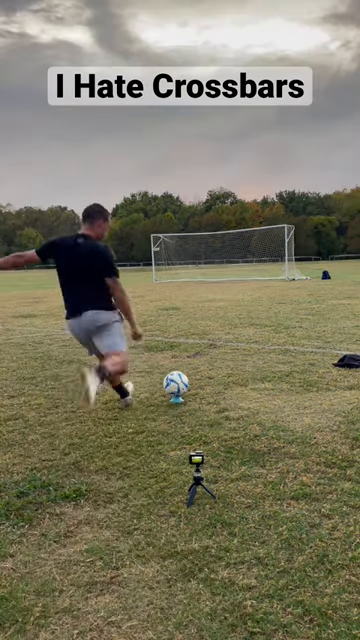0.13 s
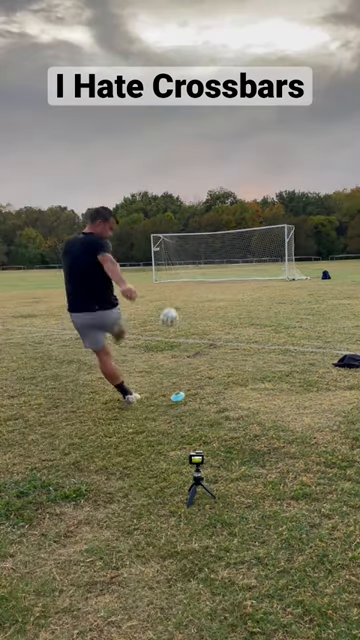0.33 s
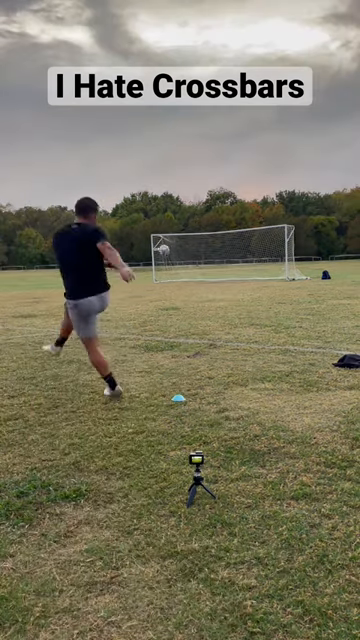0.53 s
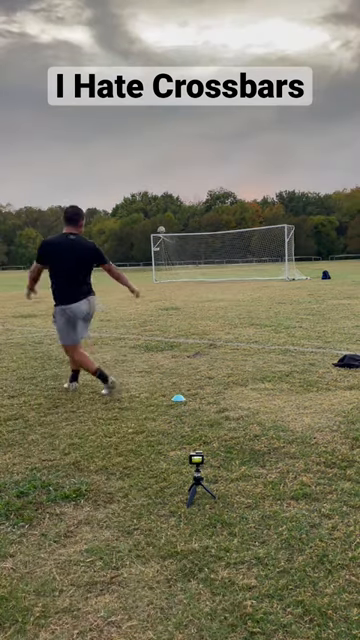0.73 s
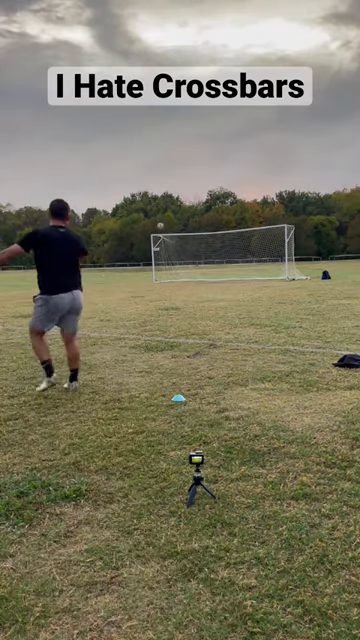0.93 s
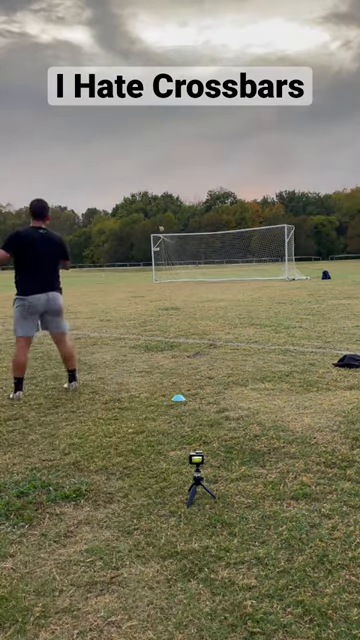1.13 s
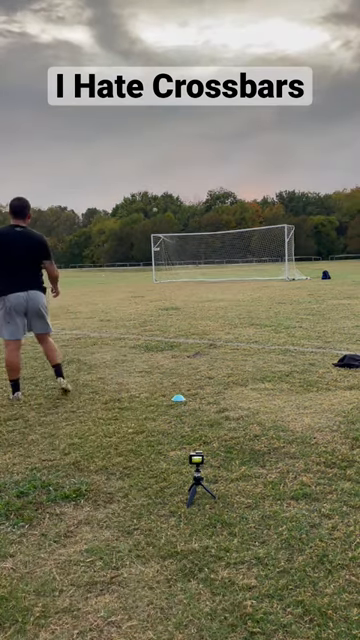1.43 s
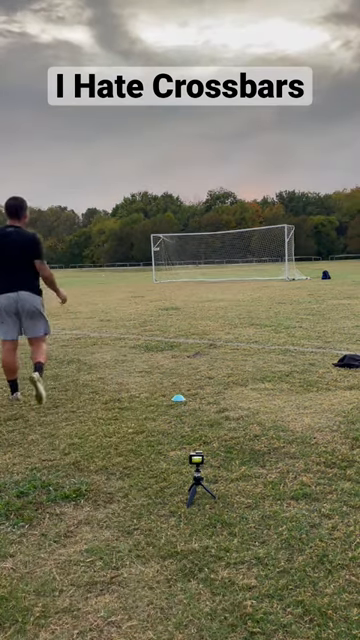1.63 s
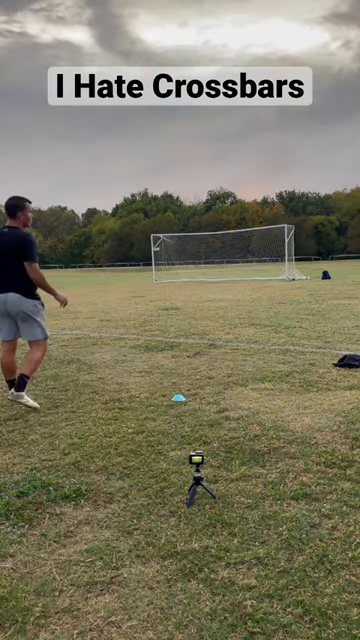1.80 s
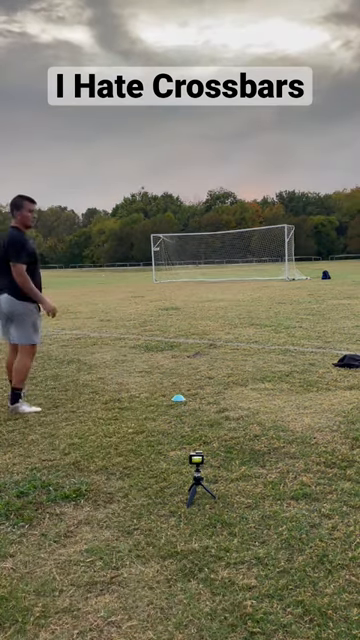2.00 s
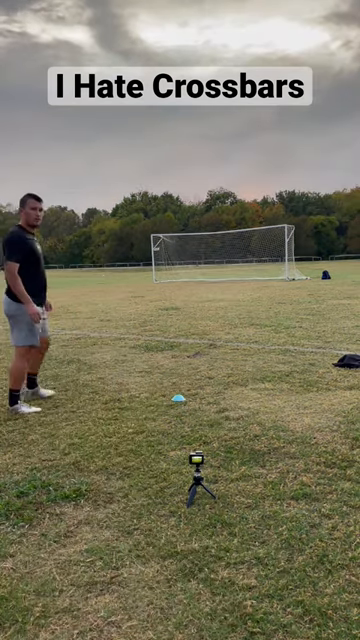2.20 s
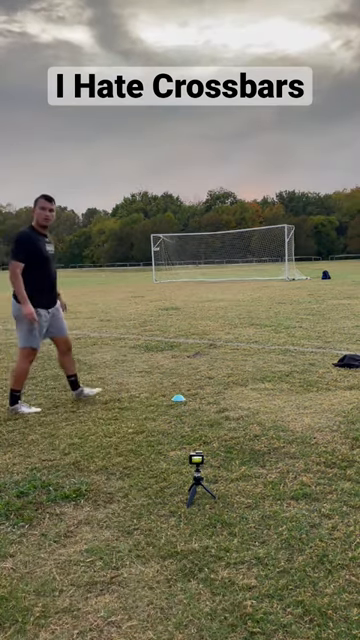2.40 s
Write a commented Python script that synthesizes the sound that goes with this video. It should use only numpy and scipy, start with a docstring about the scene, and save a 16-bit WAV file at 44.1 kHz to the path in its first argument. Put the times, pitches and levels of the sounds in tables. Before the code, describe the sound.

A boot kicks a football with a loud thump, then the ball clanks off a metal goal frame

```python
"""Boots scuff dry grass over a low outdoor rumble; then a football is kicked two metres from a phone.
The kick is a slap of coloured noise, a thump of falling pitch and the ping of the air in the ball.
A second later the ball hits the far metal goal frame: two clanks of decaying modes and noise, a
dense ring, and the rustle of the shaken net. Grains of noise make the scuffs and rustles."""
import sys
import numpy as np
from scipy import signal
from scipy.fft import rfft, irfft, next_fast_len
from scipy.io import wavfile

SR = 44100
rng = np.random.default_rng(int(sys.argv[2]) if len(sys.argv) > 2 else 0)


def unload_wav(signal):
    """Save mono or channel-first audio to the path in sys.argv[1] as 16-bit WAV at rate SR, clipped to [-1, 1]."""
    wavfile.write(
        sys.argv[1],
        SR,
        np.round(np.clip(np.atleast_2d(signal).T, -1, 1) * 32767).astype(np.int16),
    )


N = 112454  # samples

# Outdoor background, low rumble and distant hiss: freq_hz, density_db (per Hz)
RUMBLE_SPECTRUM = [(22, -45.5), (38, -17.5), (55, 4), (75, 0), (120, -3), (165, -12), (230, -17.5),
                   (310, -30.5), (450, -38), (900, -47), (3000, -76.5)]
AIR_SPECTRUM = [(150, 2.5), (450, -0.5), (900, 3), (1400, -5), (2500, -14), (3300, -19), (4500, -27),
                (8000, -35.5), (10500, -41), (13500, -23.5), (16000, -34)]
RUMBLE_DB, AIR_DB = -40, -60.5

# Soft rustle of grass, clothes and net: freq_hz, density_db (per Hz)
RUSTLE_SPECTRUM = [(400, 2.5), (2500, -4), (4500, -9.5), (6200, -10.5), (9000, -13), (13000, -7.5),
                   (16000, -24)]
# Single rustles: start_s, length_s, level_db, tilt_db (per octave)
RUSTLE_EVENTS = [(0, 0.29, -67, 1), (0.13, 0.18, -59.5, -1.5), (0.243, 0.18, -59, -0.5),
                 (0.391, 0.22, -65, -0.5), (0.525, 0.2, -63, -3), (0.631, 0.13, -65, 0),
                 (0.719, 0.14, -68.5, -0.5), (1.383, 0.05, -63, 7), (1.433, 0.059, -65, 3.5),
                 (1.466, 0.076, -83, 1), (1.865, .07, -75.5, 5.5), (2.206, .35, -83.5, 8.5)]

# Dry grass under the boot: freq_hz, density_db (per Hz)
GRASS_SPECTRUM = [(150, -4), (450, 3), (1200, -1.5), (2500, -5.5), (4500, -13.5), (6500, -14.5),
                  (9000, -10.5), (13000, -14), (16000, -16.5)]
# Boot scuffs: start_s, length_s, level_db, tilt_db (per octave)
SCUFF_EVENTS = [(0, .048, -51, -2), (0.123, .044, -49.5, 0), (0.505, 0.047, -48, -1)]
# Small snaps of stalks and studs: start_s, level_db
SNAP_EVENTS = [(.135, -42), (.1435, -41.5), (.1538, -41), (0.162, -46), (.5345, -49), (0.5436, -55),
               (.799, -66), (1.2406, -59.5), (1.7031, -48), (2.0165, -61.5)]
# Colour of a snap: freq_hz, density_db (per Hz)
SNAP_SPECTRUM = [(500, -13.5), (1800, 7.5), (3000, -9.5), (6000, 1.5), (9000, -8), (15000, -3.5)]
# Footfalls: start_s, level_db
STEP_EVENTS = [(0.144, -41), (0.518, -47), (0.65, -35.5)]
# Colour of a footfall: freq_hz, density_db (per Hz)
STEP_SPECTRUM = [(60, 3.5), (200, 18.5), (550, 3.5), (850, -13.5), (2500, -24), (12000, -77)]
SNAP_T60_S, STEP_T60_S, STEP_ATTACK_S = .00777, .04, .002

# Blows on the goal frame: start_s, ring_db, crack_db
FRAME_BLOWS = [(1.3483, -21, -24.5), (1.3599, -29, -27)]
# Modes of the goal frame: freq_hz, level_db, t60_s
FRAME_MODES = [(878, -31, .35), (921, -27.5, .58), (985, -26, .44), (1032, -23.5, .34), (1092, -23, .27),
               (1170, -4, .035), (1230, -2, .03), (1295, -22, .22), (1384, -27, .3), (1464, -26, .25),
               (1724, -2.5, .024), (1950, -9, .02), (2277, -32, .32), (2830, -27, .06), (3350, -3, .013),
               (4150, -15, .01), (5700, -7, .007)]
# Crack of ball on metal: freq_hz, density_db (per Hz)
CRACK_SPECTRUM = [(400, -24), (1000, -15.5), (1500, -6), (2400, -1), (3400, -1.5), (4600, -2), (5700, 3),
                  (8000, -7), (11000, 0), (13500, -5), (16000, -11)]
# Dense ring of the tubes: freq_hz, density_db (per Hz)
CLANG_SPECTRUM = [(150, -3), (300, 0), (600, -11), (800, -1.5), (1020, 5), (1250, -7), (1600, -7),
                  (2200, -15), (3000, -13), (4000, -26), (15000, -31)]
BAR_S, REBOUND_DB, REBOUND_ATTACK_S = 1.3486, -20.5, .0086
CRACK_T60_S, CRACK_ATTACK_S, PRESS_S = .0081, .00028, .00151
CLANG_DB, CLANG_T60_S, CLANG_ATTACK_S = -41, .33, .0048

# Slap of boot on ball: freq_hz, density_db (per Hz)
SLAP_SPECTRUM = [(200, -2.5), (420, 2.5), (690, 3), (900, -7), (1200, -4), (1750, -10), (2800, -5),
                 (4500, -8), (6400, -9.5), (8000, -10), (13000, -8), (15500, -13)]
# Boot contacts: start_s, level_db, t60_s, tilt_db (per octave)
SLAP_CONTACTS = [(0.2354, -35, 0.06, -0.5), (0.2433, -9, 0.012, -1.5), (0.2497, -21.5, 0.062, -4),
                 (0.2556, -26.5, .013, .5)]
# Short modes of the ball's skin: freq_hz, level_db, t60_s
SKIN_MODES = [(1098.6, -6.5, 0.033), (1210, 0, 0.021), (1451, -10.5, .04), (1630, -15.5, .045),
              (2095, -8, .025), (2374, -3, 0.0091), (2790, -4.5, 0.014), (6427, -6.5, 0.012)]
# Air modes inside the ball: freq_hz, level_db, t60_s, swells_per_s, crest_s
AIR_MODES = [(1007, -2, .45, 8, .292), (1615, 0, .3, 10, .272), (2223, -2, .65, 10, .298),
             (2923, 4, .75, 6, .375), (3580, -5, .65, 7.5, .32), (3795, -12, .6, 8, .305),
             (4215, -11, .45, 9, .275)]
KICK_S, KICK_DB, KICK_ATTACK_S = .24385, -1.2, .0017
SKIN_DB, BALL_DB, SPIN_DEPTH, FLY_OFF_S = -10.5, -55, .52, .28
# The thump's pitch lies above its end pitch by a fast drop and a slower sag, each exponential
THUMP_END_HZ, THUMP_DROP_HZ, THUMP_SAG_HZ = 36.8, 906, 127.4
THUMP_DROP_S, THUMP_SAG_S = .00165, .0189  # time constants
THUMP_HOLD_S, THUMP_T60_S = .0165, .034

# Phase lead of the left microphone port: freq_hz, lead_rad
PORT_LEAD = [(0, 0), (1500, .17), (3300, .65), (4300, .5), (5200, .1), (7300, 1.5), (9900, 3.1),
             (11500, 3.7), (14700, 6.1), (16500, 6.2)]
CEILING, TOP_HZ = 1, 15900  # peak amplitude, upper band edge


def undb(db):
    """A level in decibels is twenty times the logarithm of the amplitude; this inverts it."""
    return 10 ** (np.asarray(db) / 20)


def since(start):
    """Local time: seconds elapsed since a moment, zero before it."""
    return np.maximum(np.arange(N) / SR - start, 0)


def fade(t, t60):
    """Linear damping: amplitude decays exponentially, by 60 dB in t60 seconds."""
    return np.exp(-np.log(1000) * t / t60)


def noise():
    """White noise: independent Gaussian samples of unit variance."""
    return rng.standard_normal(N)


def colour(x, points, tilt_db=0):
    """Minimum-phase filtering: a causal response of given spectrum that keeps white-noise power."""
    hz, db = np.array(points).T
    size = 2 * next_fast_len(N)
    octave = np.log2(np.maximum(np.fft.rfftfreq(size, 1 / SR), 1))
    tilt = tilt_db * np.maximum(octave, np.log2(hz[0]))
    gain = undb(np.interp(octave, np.log2(hz), db) + tilt)
    cepstrum = irfft(np.log(gain / np.sqrt(np.mean(gain ** 2))))
    # folding the cepstrum onto positive time makes the filter causal
    cepstrum[1:size // 2] *= 2
    cepstrum[size // 2 + 1:] = 0
    return irfft(rfft(x, size) * np.exp(rfft(cepstrum)))[:N]


def burst(start, t60, attack=.0003):
    """Impact noise: random signs of equal strength rise sharply and decay exponentially."""
    t = since(start)
    return np.sign(noise()) * np.minimum(t / attack, 1) * fade(t, t60)


def ring(start, modes):
    """Modal superposition: a struck body sounds as a sum of damped sinusoids."""
    t = since(start)
    return sum(undb(db) * np.sin(2 * np.pi * hz * t) * fade(t, t60) for hz, db, t60 in modes)


def crackle(start, length, grain):
    """Granular friction: uneven grains in millisecond clusters swell and fade as half a sine."""
    clusters = np.repeat(rng.standard_normal(N // 50 + 1), 50)[:N]
    grains = noise() * np.exp(grain * np.clip(clusters, -2, 2))
    swell = np.abs(np.sin(np.pi * np.minimum(since(start) / length, 1)))
    return swell * grains / np.std(grains)


def field():
    """Coherent and diffuse fields: rumble common to both sides, hiss independent on each."""
    rumble = undb(RUMBLE_DB) * colour(noise(), RUMBLE_SPECTRUM)
    hiss = np.array([colour(noise(), AIR_SPECTRUM) for _ in range(2)])
    return rumble + undb(AIR_DB) * hiss


def rustle():
    """Light friction: the moving player and net give faint swells of fine grains."""
    return sum(undb(db) * colour(crackle(start, length, grain=.54), RUSTLE_SPECTRUM, tilt_db)
               for start, length, db, tilt_db in RUSTLE_EVENTS)


def feet():
    """Friction, fracture and impact: boots brush the grass, snap stalks and land on the turf."""
    scuffs = sum(undb(db) * colour(crackle(start, length, grain=1.0), GRASS_SPECTRUM, tilt_db)
                 for start, length, db, tilt_db in SCUFF_EVENTS)
    snaps = sum(undb(db) * burst(start, SNAP_T60_S) for start, db in SNAP_EVENTS)
    steps = sum(undb(db) * burst(start, STEP_T60_S, STEP_ATTACK_S) for start, db in STEP_EVENTS)
    return scuffs + colour(snaps, SNAP_SPECTRUM) + colour(steps, STEP_SPECTRUM)


def thump(start, attack):
    """Transient oscillation: the squashed ball swings a few times at quickly falling pitch."""
    t = since(start)
    drop = THUMP_DROP_HZ * np.exp(-t / THUMP_DROP_S)
    sag = THUMP_SAG_HZ * np.exp(-t / THUMP_SAG_S)
    hz = THUMP_END_HZ + drop + sag
    swing = -np.sin(2 * np.pi * np.cumsum(hz * (t > 0)) / SR)  # phase is the integral of pitch
    decay = fade(np.maximum(t - THUMP_HOLD_S, 0), THUMP_T60_S)
    return swing * np.minimum(t / attack, 1) * decay


def goal():
    """Impact excitation: the ball thumps, two blows crack and ring the tubes, a dense clang hangs on."""
    rebound = undb(REBOUND_DB) * thump(BAR_S, REBOUND_ATTACK_S)
    clang = undb(CLANG_DB) * colour(burst(BAR_S, CLANG_T60_S, CLANG_ATTACK_S), CLANG_SPECTRUM)
    out = rebound + clang
    for start, ring_db, crack_db in FRAME_BLOWS:
        # the modes begin just before the crack, growing as the ball presses on the tube
        contact = start - PRESS_S
        press = np.minimum(since(contact) / PRESS_S, 1) ** 2
        crack = colour(burst(start, CRACK_T60_S, CRACK_ATTACK_S), CRACK_SPECTRUM)
        out = out + undb(ring_db) * press * ring(contact, FRAME_MODES) + undb(crack_db) * crack
    return out


def ping():
    """Cavity resonance: air modes swell and dip with the spin and fade as the ball flies off."""
    t = np.arange(N) / SR
    modes = 0
    for hz, db, t60, rate, crest in AIR_MODES:
        spin = 1 + SPIN_DEPTH * np.cos(2 * np.pi * rate * (t - crest))
        modes = modes + spin * ring(KICK_S, [(hz, db, t60)])
    return modes / (1 + (since(KICK_S) / FLY_OFF_S) ** 6)


def kick():
    """Impact and resonance: the boot slaps the ball, which thumps, rings in its skin and pings."""
    slap = sum(undb(db) * colour(burst(start, t60), SLAP_SPECTRUM, tilt_db)
               for start, db, t60, tilt_db in SLAP_CONTACTS)
    body = undb(KICK_DB) * thump(KICK_S, KICK_ATTACK_S)
    skin = -undb(SKIN_DB) * ring(KICK_S, SKIN_MODES)  # same polarity as the thump
    return body + slap + skin + undb(BALL_DB) * ping()


def ports(x):
    """Phase difference: frontal sound reaches two microphone ports slightly out of step."""
    lead = np.interp(np.fft.rfftfreq(N, 1 / SR), *np.array(PORT_LEAD).T)
    right = irfft(rfft(x) * np.exp(-1j * lead), N)
    return np.array([x, right])


def scene():
    """Superposition: the frontal sources pass the two ports and add to the field."""
    return field() + ports(rustle() + feet() + goal() + kick())


def record(dry):
    """Saturation and band limiting: the phone rounds off the loudest peaks and cuts the top."""
    rounded = dry / (1 + (dry / CEILING) ** 6) ** (1 / 6)
    # order 8, 0.1 dB ripple and 60 dB stopband in each of the two directions
    lowpass = signal.ellip(8, .1, 60, TOP_HZ, fs=SR, output="sos")
    return signal.sosfiltfilt(lowpass, rounded)


dry = scene()
out = record(dry)
unload_wav(out)
```